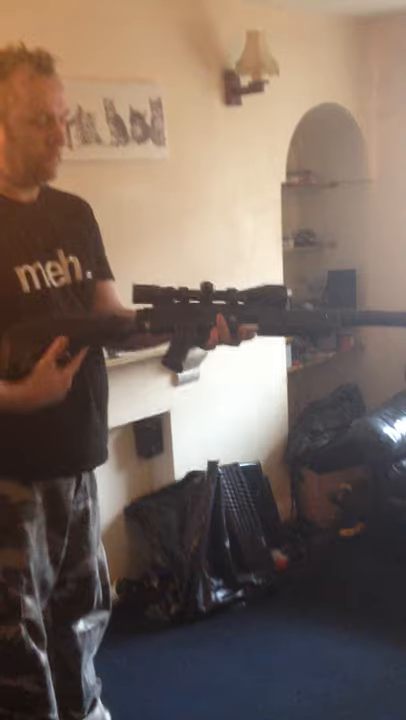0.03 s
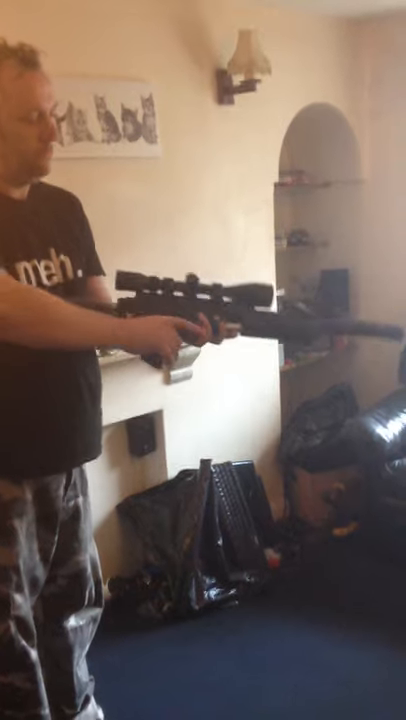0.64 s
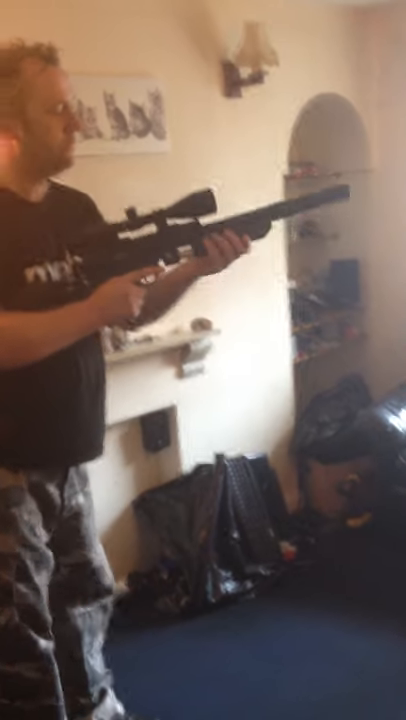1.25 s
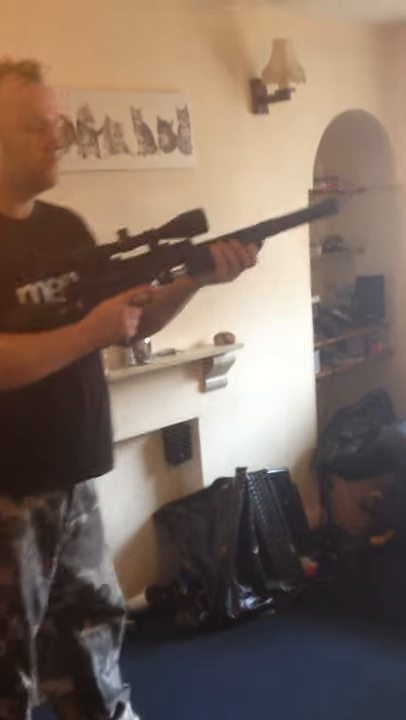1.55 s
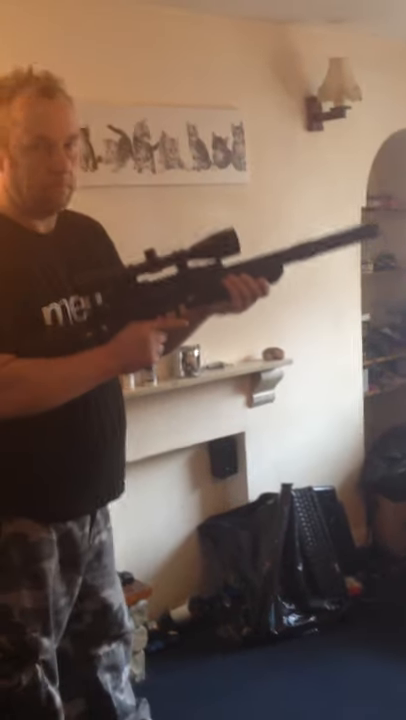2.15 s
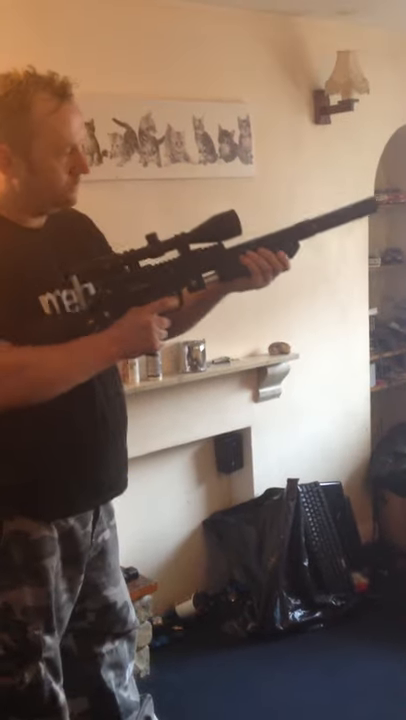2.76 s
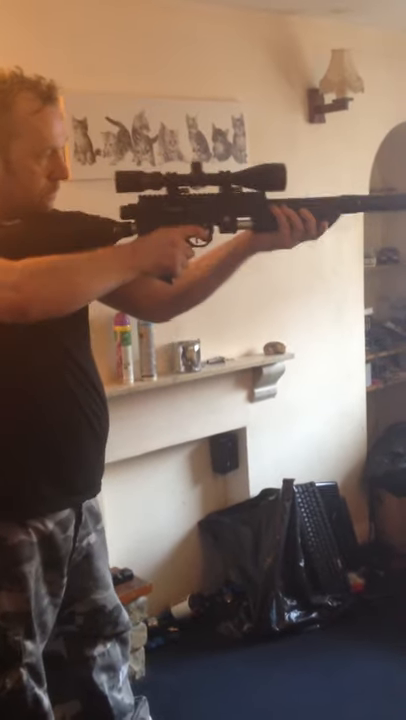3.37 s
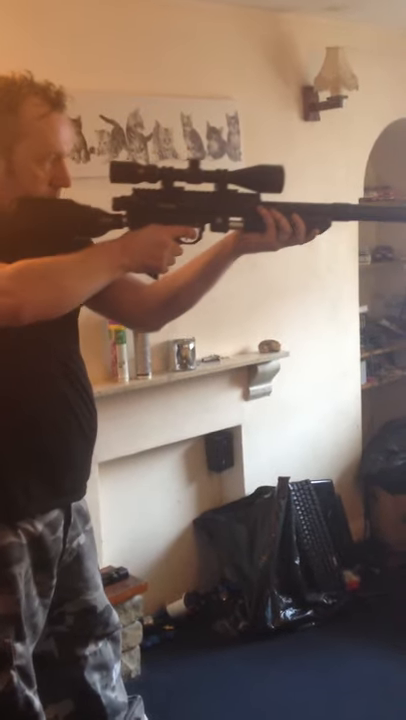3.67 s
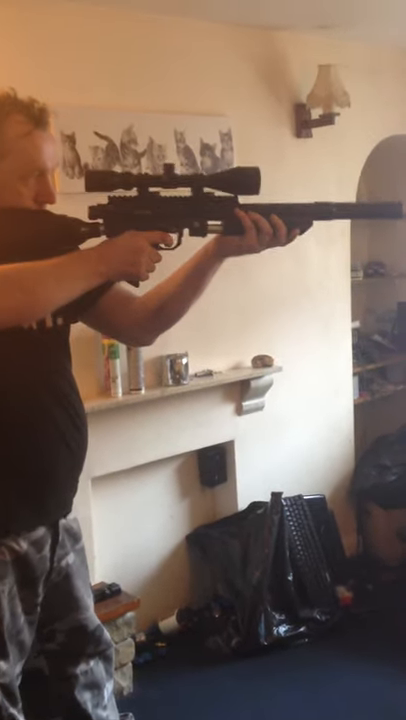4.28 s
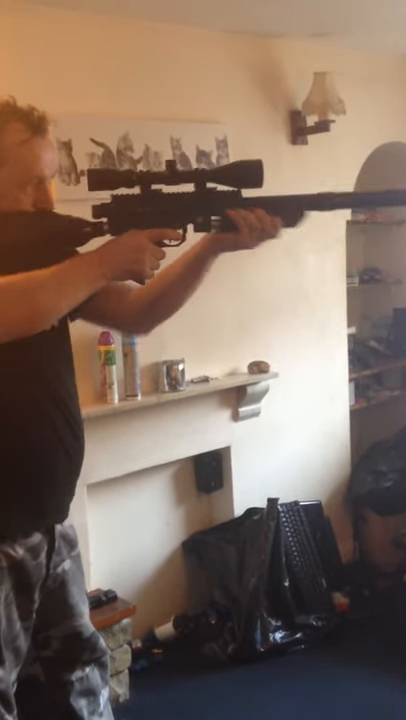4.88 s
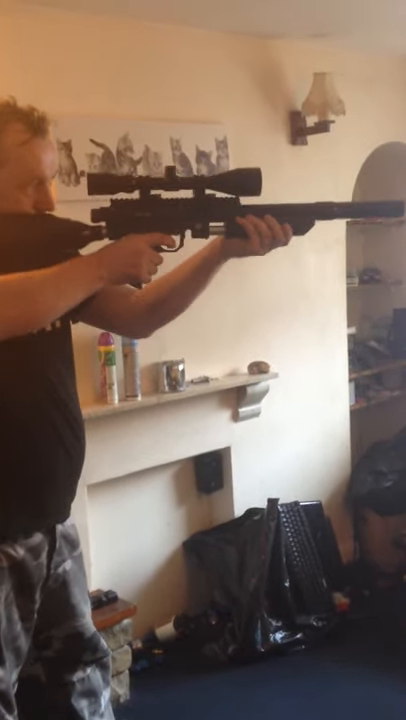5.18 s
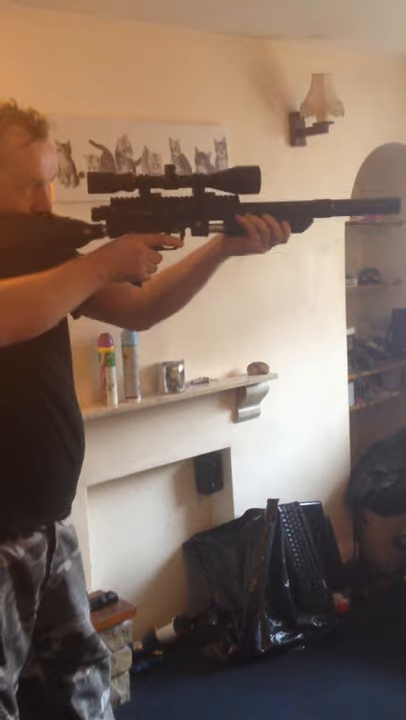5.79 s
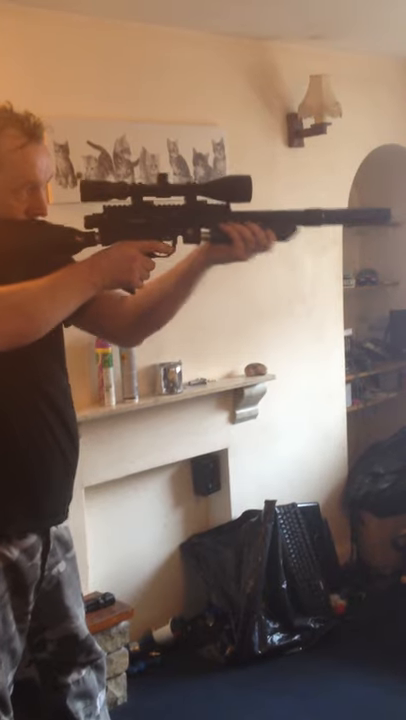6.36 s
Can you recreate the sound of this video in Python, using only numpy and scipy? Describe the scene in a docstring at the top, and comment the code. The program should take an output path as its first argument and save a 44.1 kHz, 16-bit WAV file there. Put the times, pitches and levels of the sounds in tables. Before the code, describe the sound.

In a quiet living room, a pump-action air rifle gives two light metallic clacks. Fingers then knock twice, loud and close, on the phone that picks up the sound. The silenced rifle fires three times, just under a second apart, about two metres away. Each shot is a hollow pop that briefly rings in the room, followed by quieter clacks of the pump handle. Faint rumble and hiss lie underneath.

```python
"""Air rifle in a living room

A silenced pump-action air rifle fires three times, two metres from a phone. Each shot is a pop of air
that sets rifle and room ringing. The pump handle clacks shut twice beforehand, slides back after each
shot and shuts again between shots. Fingers knock and rub on the phone's case, over a faint room
rumble, mains hum and microphone hiss."""
import sys
import numpy as np
from scipy import signal
from scipy.fft import rfft, irfft
from scipy.io import wavfile

SR = 44100
rng = np.random.default_rng(int(sys.argv[2]) if len(sys.argv) > 2 else 0)


def transcribe(signal):
    """Save signal, clipped to [-1, 1], as a 16-bit WAV file at the path in sys.argv[1]."""
    frames = np.atleast_2d(signal).T
    limited = np.clip(frames, -1, 1)
    pcm = np.round(limited * 32767).astype(np.int16)
    wavfile.write(sys.argv[1], SR, pcm)


N = 292383
T = np.arange(N) / SR
AGE = T[:SR]  # seconds since a hit

# each shot: (time [s], relative level [dB], treble tilt [dB per octave])
SHOTS = [(4.4511, 2.5, 0.55), (5.3217, 0.5, 1), (6.1507, 1.04, .1)]
# the tone of the pop, from bass to treble: (frequency [Hz], level [dB])
POP_TONE = [(30, -44.5), (80, -32), (140, -7), (230, -2.5), (320, 1), (410, -0.5), (500, -5.5),
            (630, -16.5), (1000, -8.5), (1650, -16.5), (1850, -22), (2300, -22.5), (2850, -25.5),
            (3600, -38.5), (5400, -37), (8500, -57), (14500, -63)]
# the notes that rifle and room ring with: (frequency [Hz], level [dB])
SHOT_NOTES = [(152, -1.5), (189, -1), (248, 0.5), (268, 3), (299, -1.5), (336, 3), (385, 3.5), (447, -5),
              (463, -3), (497, -3.5), (597, -3), (721, -8.5), (833, -2), (906, -8), (972, -5.5), (1049, -3),
              (1081, -32), (1156, -21), (1184, -3), (1283, -15.5), (1410, -9), (1535, -15.5), (1622, -11),
              (1745, -9.5), (2318, -19), (2688, -48), (2773, -19.5), (2922, -47), (5161, -30.5),
              (5354, -53)]


def shots(pop_db=3.5, ring_db=5, hiss_db=-7, hiss_fade_s=0.048, swell_s=0.013):
    """The valve dumps its air in a hissy pop, aimed away, so the room is louder than the direct sound."""
    walls = room(echo_db=-1.5, tail_db=10.5, build_s=0.0067)
    ringing = ring([(hz, db, at_hz(ROOM_FADE, hz)) for hz, db in SHOT_NOTES])
    ringing *= 1 - np.exp(-(AGE / swell_s) ** 2)  # the room's notes take a moment to build
    out = np.zeros(N)
    for s, db, tilt_db in SHOTS:
        puff = undb(hiss_db) * burst(hiss_fade_s)
        puff[0] += 1  # the sudden jump in pressure
        pop = unit(signal.fftconvolve(colour(puff, POP_TONE, tilt_db), walls)[:SR])
        add(out, s, undb(db) * (undb(pop_db) * pop + undb(ring_db) * unit(ringing)))
    return out


# the pump handle slides back: (unlock time [s], stop time [s], relative level [dB])
PUMP_PULLS = [(4.729, 4.8, -13.5), (5.547, 5.598, -17.5), (6.41, 6.4634, -16.5)]
# it slams shut: (catch time [s], slam time [s], relative level [dB], pitch [ratio], bounce vs slam [dB])
PUMP_SLAMS = [(2.165, 2.1888, -9, .88, 1), (2.4766, 2.4976, -5, 1.015, -0.5),
              (4.978, 5.0033, -5, 1.01, -12), (5.8164, 5.8422, -4.5, 0.98, -16)]


def pump(level_db=-19, pull_bounce_s=0.0092, slam_bounce_s=0.0055, bounce_pitch=0.84, low_cut_hz=130):
    """Pulled back, the handle unlocks, slides, stops and bounces; pushed, it catches, slams and bounces."""
    out = np.zeros(N)
    for unlock_s, stop_s, db in PUMP_PULLS:
        add(out, unlock_s, undb(db - 2.5) * clack())
        add(out, unlock_s, undb(db - 2) * slide(stop_s - unlock_s))
        add(out, stop_s, undb(db) * clack())
        add(out, stop_s + pull_bounce_s, undb(db - 2.5) * clack())
    for catch_s, slam_s, db, pitch, bounce_db in PUMP_SLAMS:
        add(out, catch_s, undb(db - 2.5) * catch())
        add(out, slam_s, undb(db) * clack(pitch, tilt_db=-1.5))
        add(out, slam_s + slam_bounce_s, undb(db + bounce_db) * clack(pitch * bounce_pitch, tilt_db=-1.5))
    low_cut = signal.butter(2, low_cut_hz, "high", fs=SR, output="sos")  # small parts give off little bass
    out = undb(level_db) * signal.sosfilt(low_cut, out)
    return signal.fftconvolve(out, room(echo_db=-12, tail_db=2.5, build_s=0.00058))[:N]


# the notes of the pump's metal parts: (frequency [Hz], level [dB], fade time [s])
METAL_NOTES = [(1165, 1, 0.04), (1310, 8.5, 0.026), (1408, 4, 0.027), (1800, -4, 0.018),
               (2090, -23.5, 0.24), (2100, -45, 0.12), (4170, -20, 0.012)]
# the tone of their clicks and scrapes: (frequency [Hz], level [dB])
CLACK_TONE = [(40, -42), (100, -16.5), (200, 2), (400, 12), (700, -2.5), (1200, 0), (2100, -4),
              (2700, -15.5), (3300, -39), (4400, -22), (7000, -32), (10000, -64), (15000, -49)]


def clack(pitch=0.95, tilt_db=0.5, ring_db=2, scrape_db=-2):
    """A metal part hits its stop: a click, a brief scrape and a ringing snap."""
    click = undb(scrape_db) * burst(fade_s=0.03)
    click[0] += 1
    snap = ring(METAL_NOTES, pitch, scatter=0)
    return unit(colour(click, CLACK_TONE, tilt_db)) + undb(ring_db) * snap


def slide(length_s, roughness_db=4, ring_db=-3):
    """The rails rub: many tiny, uneven clicks set the metal ringing."""
    clicks = rng.standard_normal(SR) * undb(roughness_db * rng.exponential(size=SR)) * (AGE < length_s)
    ringing = signal.fftconvolve(clicks, ring(METAL_NOTES, scatter=0))[:SR]
    return unit(colour(clicks, CLACK_TONE, tilt_db=2.5)) + undb(ring_db) * unit(ringing)


# the notes of the catch: (frequency [Hz], level [dB], fade time [s])
CATCH_NOTES = [(788, -7, 0.042), (830, -2, 0.027), (1000, -4, 0.016), (1200, -6, 0.026)]


def catch(click_db=-5, rise_s=0.0011):
    """The catch slips into its notch: a soft click and a hollow knock."""
    click = colour(burst(fade_s=0.04), CLACK_TONE, tilt_db=1.5)
    knock = ring(CATCH_NOTES) * (1 - np.exp(-AGE / rise_s))
    return undb(click_db) * unit(click) + unit(knock)


# fingers knock on the phone: (time [s], level [dB], contact time [s], second touch [ratio],
# its delay [s], muffled after [s], rattle vs knock [dB], shove vs knock [dB])
KNOCKS = [(0.2095, -19.5, 0.00014, 0.57, 0.0011, .014, -38, -24),
          (0.242, -31.5, 0.0014, .2, .001, .014, -32, -40),
          (0.7806, -14, 0.00018, 0.28, 0.0013, .012, -29, -40),
          (2.821, -29, 0.00033, .2, .001, .014, -30, -40),
          (3.402, 15.5, 0.000042, -0.38, .00112, .02, -24.5, -39.5),
          (4.239, 13.5, 0.000045, .33, 0.003, 0.019, -50.5, -21)]
# the notes of the phone's loose parts: (frequency [Hz], level [dB], fade time [s])
RATTLE_NOTES = [(315, 2.5, 0.044), (510, 0.5, .06), (660, 1, .06), (1000, -10, 0.05), (1150, -11, 0.04)]


def knocks(crack_db=-44, shove_s=0.014, bounce_s=0.0099, bounce_db=-28.5, bounce_crack_db=-27):
    """The plastic case thumps, cracks and rattles, then bounces once as it settles in the hand."""
    out = np.zeros(N)
    shove = unit(np.sin(np.pi * np.minimum(AGE / shove_s, 1)) ** 2)  # the whole phone moves
    for s, db, contact_s, second, delay_s, muffle_s, rattle_db, shove_db in KNOCKS:
        hit = thump(contact_s, second, delay_s, muffle_s)
        crack = undb(crack_db) * burst(fade_s=0.02)
        rattle = undb(rattle_db) * ring(RATTLE_NOTES)
        add(out, s, undb(db) * (hit + crack + undb(shove_db) * shove + rattle))
        bounce = hit + undb(bounce_crack_db) * burst(fade_s=0.02)
        add(out, s + bounce_s, undb(db + bounce_db) * bounce)
    return out


# the tone of the phone's case: (frequency [Hz], level [dB])
CASE_TONE = [(30, -27.5), (55, -29), (100, -7.5), (160, 13), (290, 3.5), (500, -3.5), (1100, -10),
             (1600, -12.5), (2400, -28), (3600, -24.5), (6000, -41), (14000, -48.5)]


def thump(contact_s, second=0, delay_s=0, muffle_s=0.005):
    """A fingertip lands on the case, once or twice in quick succession."""
    push = (AGE / contact_s) ** 2 * np.exp(-AGE / contact_s)  # a softer finger pushes longer: duller
    force = push + second * np.interp(AGE - delay_s, AGE, push)
    muffle = np.exp(-(AGE / muffle_s) ** 2)  # the holding hand stops the case dead
    return unit(colour(force, CASE_TONE) * muffle)


# small dry ticks: (time [s], level [dB])
TICKS = [(2.288, -30.5), (2.4168, -34)]


def ticks(crack_db=-19):
    """Light, hard ticks as the rifle is handled: a tiny thump with a dry crack."""
    out = np.zeros(N)
    for s, db in TICKS:
        add(out, s, undb(db) * (thump(contact_s=0.000025) + undb(crack_db) * burst(fade_s=0.02)))
    return out


# fingers shift their grip: (time [s], length [s], level [dB])
RUBS = [(0.405, 0.023, -67), (1.507, 0.092, -56.5), (3.635, 0.065, -53.5), (4.321, 0.07, -55)]


def grip(squeak_at_s=0.513, squeak_s=0.022, slip_hz=252, squeak_db=-42, octave_db=-4, tail_db=-11):
    """Skin sticks and slips on the case in one short squeak; other shifts only rustle dully."""
    out = np.zeros(N)
    swell = undb(tail_db) * fade(0.27) * np.minimum(AGE / squeak_s, 1)  # the squeak's soft tail
    add(swell, 0, signal.windows.tukey(int(squeak_s * SR), 0.5))
    phase = 2 * np.pi * slip_hz * AGE
    squeak = np.cos(phase) + undb(octave_db) * np.cos(2 * phase)
    add(out, squeak_at_s, undb(squeak_db) * swell * squeak)
    for s, length_s, db in RUBS:
        rustle = band(rng.standard_normal(SR), hz=216, width_hz=110)
        rustle = band(rustle, hz=140, width_hz=160)
        swell = np.hanning(int(length_s * SR))
        add(out, s, undb(db) * swell * rustle[:len(swell)] / rustle.std())
    return out


# echoes off nearby walls and ceiling: (delay [s], relative strength [ratio])
ECHOES = [(.0077, -0.11), (0.0097, 0.45), (0.0125, -1.34), (0.0239, 0.54), (0.0266, 1), (0.029, .8),
          (0.036, -1.2), (0.0568, 0.28)]
# how long the room rings: (frequency [Hz], fade time [s])
ROOM_FADE = [(100, 0.24), (180, 0.34), (260, 0.44), (380, 0.32), (700, 0.33), (1400, 0.33), (3000, 0.31),
             (6000, 0.27), (14000, 0.22)]


def room(echo_db, tail_db, build_s, bands=28):
    """The room answers a click: direct sound, first echoes, then a wash that builds and dies away."""
    early = np.zeros(SR)
    for s, gain in ECHOES:
        add(early, s, np.array([gain * undb(echo_db)]))
    early[0] = 1  # the direct sound
    edges = np.r_[0, np.geomspace(90, SR / 2, bands)]
    hz = np.arange(SR // 2 + 1)
    spectrum = rfft(rng.standard_normal(SR))
    tail = np.zeros(SR)
    for low, high in zip(edges, edges[1:]):
        wash = irfft(spectrum * ((hz >= low) & (hz < high)))
        wash *= fade(at_hz(ROOM_FADE, (low + high) / 2))
        tail += unit(wash * (1 - np.exp(-AGE / build_s))) * np.sqrt(high - low)
    return unit(early + undb(tail_db) * unit(tail))


# the tone of the rumble and hiss: (frequency [Hz], relative level [dB])
NOISE_TONE = [(30, -38.5), (65, -26.5), (95, -11.5), (150, -6), (220, -1), (290, -9), (390, -10.5),
              (470, -15), (620, -17.5), (2000, -26), (4800, -29.5), (9500, -37.5), (14200, -32),
              (15500, -30.5)]
# the hum of a distant appliance: (frequency [Hz], level [dB])
HUM_NOTES = [(100, -84.5), (199.2, -82), (242.2, -77), (382.2, -86), (484.5, -76)]


def background(noise_db=-66.5):
    """Room rumble, microphone hiss and a slightly wavering hum."""
    noise = unit(colour(rng.standard_normal(N), NOISE_TONE)) * np.sqrt(N) * undb(noise_db)
    hum = np.zeros(N)
    for hz, db in HUM_NOTES:
        waver = 1.2 * np.cumsum(rng.standard_normal(N)) / np.sqrt(SR)
        hum += np.sqrt(2) * undb(db) * np.sin(2 * np.pi * hz * T + waver)
    return noise + hum


def ring(notes, pitch=1, scatter=1):
    """A struck object's fading notes: scatter 0 starts them in step (a hard snap), 1 out of step."""
    return unit(sum(undb(db) * fade(fade_s) * np.sin(2 * np.pi * (hz * pitch * AGE + scatter * rng.random()))
                    for hz, db, fade_s in notes))


def burst(fade_s):
    """Noise that starts at once and dies away."""
    return unit(rng.standard_normal(SR) * fade(fade_s))


def fade(fade_s):
    """A smooth dying away: the fade time is how long it takes to drop 60 dB."""
    return np.exp(-np.log(1000) * AGE / fade_s)


def colour(x, tone, tilt_db=0, size=4096):
    """Give a sound a tone; tilt_db brightens it by that much per octave, pivoting at 1 kHz."""
    hz = np.maximum(np.arange(size // 2 + 1) * SR / size, 20)
    gain = undb(at_hz(tone, hz) + tilt_db * np.log2(hz / 1000))
    cepstrum = irfft(np.log(gain))
    cepstrum[1:size // 2] *= 2  # fold it in half, so nothing sounds before the hit
    cepstrum[size // 2 + 1:] = 0
    return signal.fftconvolve(x, irfft(np.exp(rfft(cepstrum))))[:len(x)]


def band(x, hz, width_hz):
    """Keep the part of a sound near one frequency."""
    return signal.lfilter(*signal.iirpeak(hz, hz / width_hz, fs=SR), x)


def at_hz(points, hz):
    """Read between the rows of a (frequency, value) table, with octaves evenly spaced."""
    row_hz, value = np.transpose(points)
    return np.interp(np.log(np.maximum(hz, 1)), np.log(row_hz), value)


def undb(db):
    """Turn decibels into a multiplier."""
    return 10 ** (np.asarray(db) / 20)


def unit(x):
    """Scale to an energy of one."""
    return x / np.sqrt(np.sum(x ** 2))


def add(track, s, sound):
    """Mix a sound into a track at time s."""
    i = int(round(s * SR))
    track[i:i + len(sound)] += sound[:N - i]


def scene():
    """Rifle, fingers and room at one microphone."""
    return (shots() + pump() + knocks() + ticks() + grip() + background())[None]


def auto_volume(x, limit_db=-7, recover_db_per_s=4, smooth_hz=10):
    """A peak over the limit turns the volume down; then it creeps back up."""
    over_db = np.maximum(20 * np.log10(np.abs(x) + 1e-9) - limit_db, 0)
    recovery_db = recover_db_per_s * T
    cut_db = np.maximum.accumulate(over_db + recovery_db, axis=-1) - recovery_db
    return x * undb(-signal.lfilter(*signal.butter(1, smooth_hz, fs=SR), cut_db))


def record(dry, start_s=0.12, top_hz=15350):
    """The microphone opens a moment late, turns loud sounds down and cuts the highest treble."""
    treble_cut = signal.ellip(10, 0.2, 60, top_hz, fs=SR, output="sos")
    return signal.sosfilt(treble_cut, auto_volume(dry * (T > start_s)))


dry = scene()
out = record(dry)
transcribe(out)
```